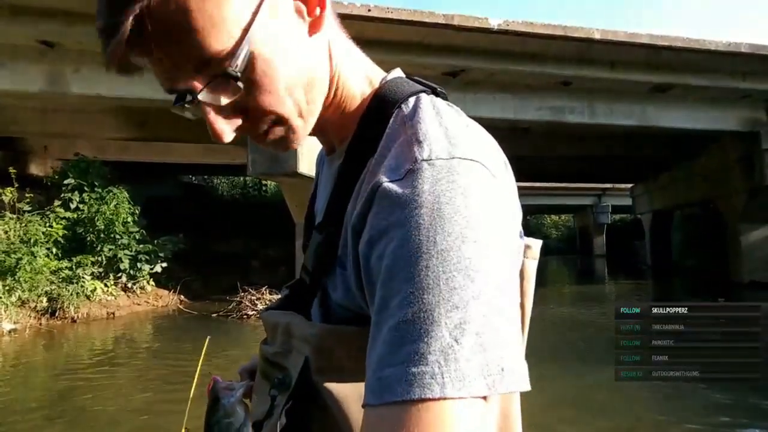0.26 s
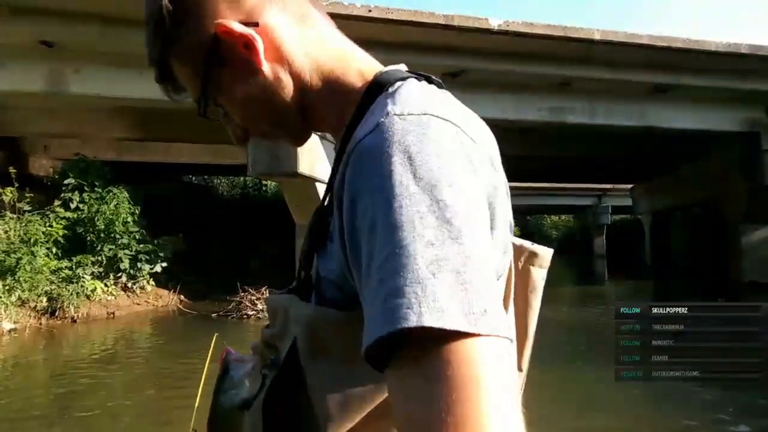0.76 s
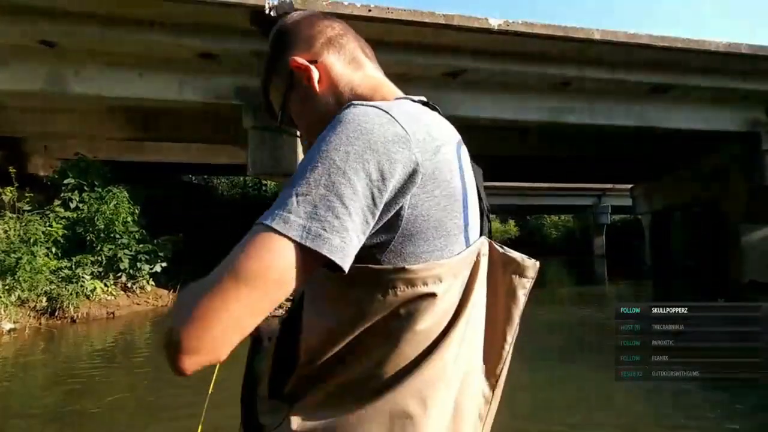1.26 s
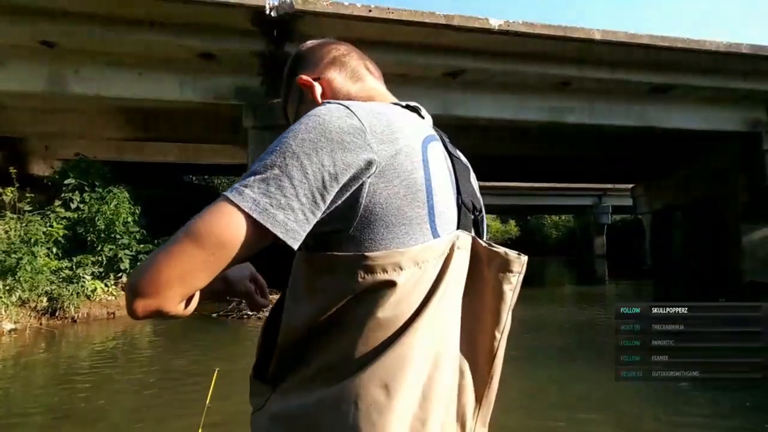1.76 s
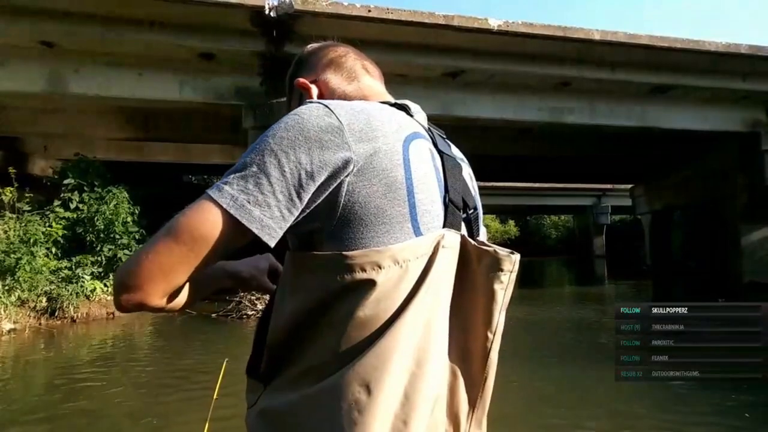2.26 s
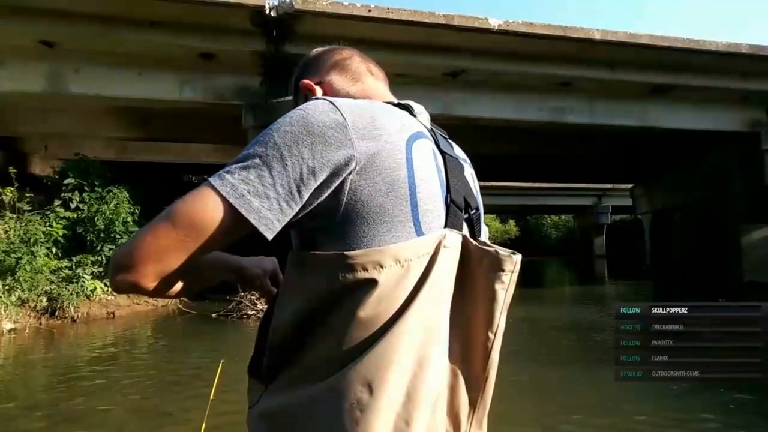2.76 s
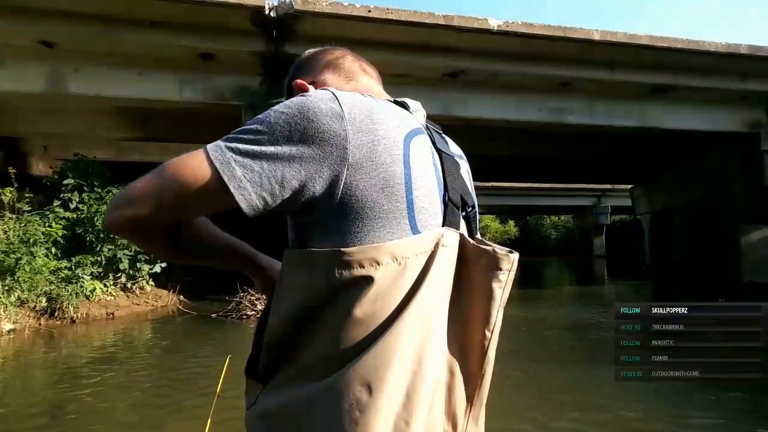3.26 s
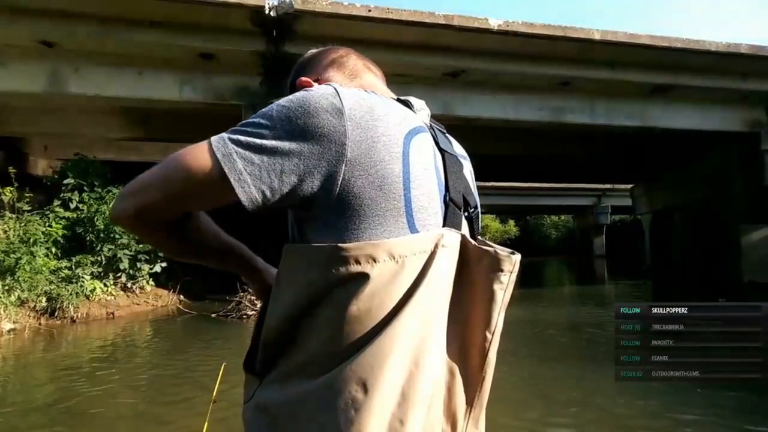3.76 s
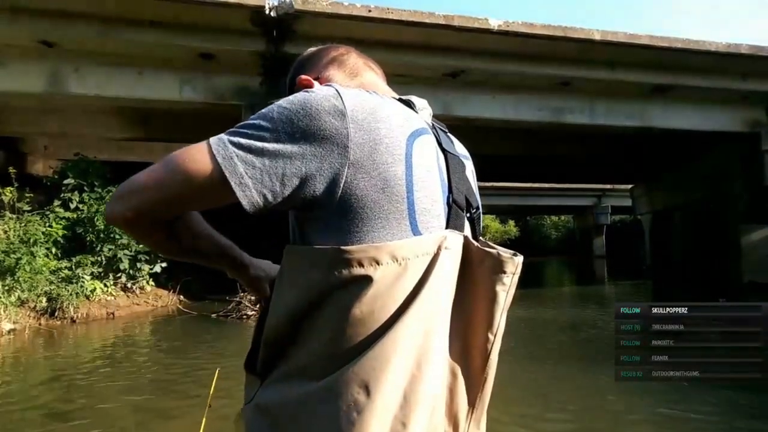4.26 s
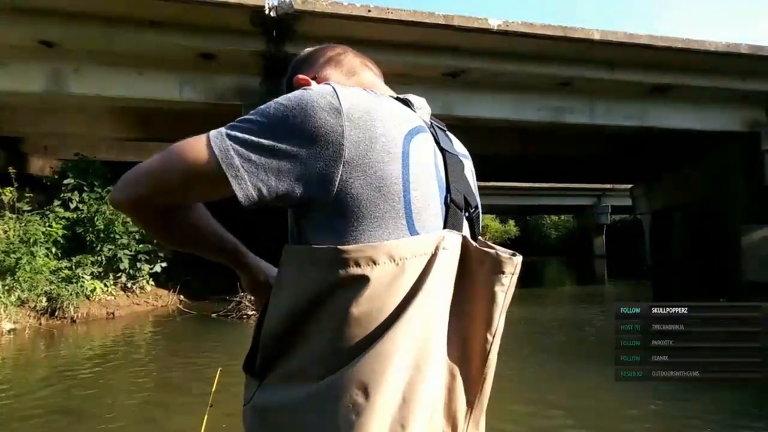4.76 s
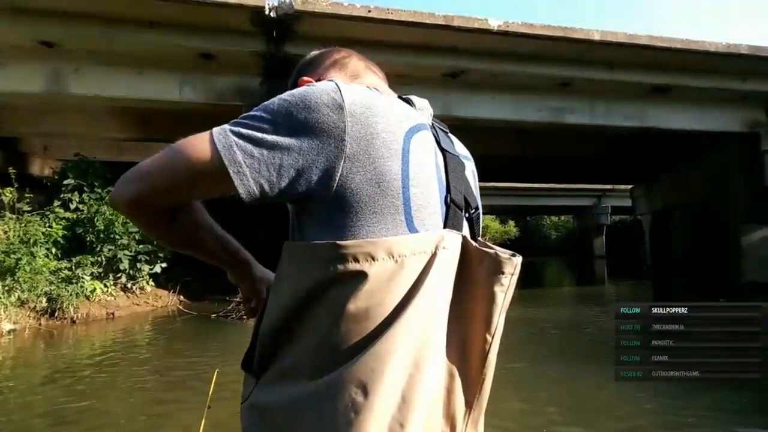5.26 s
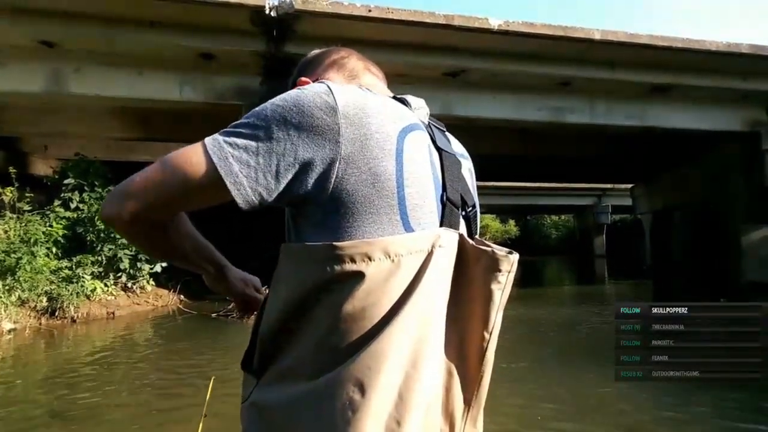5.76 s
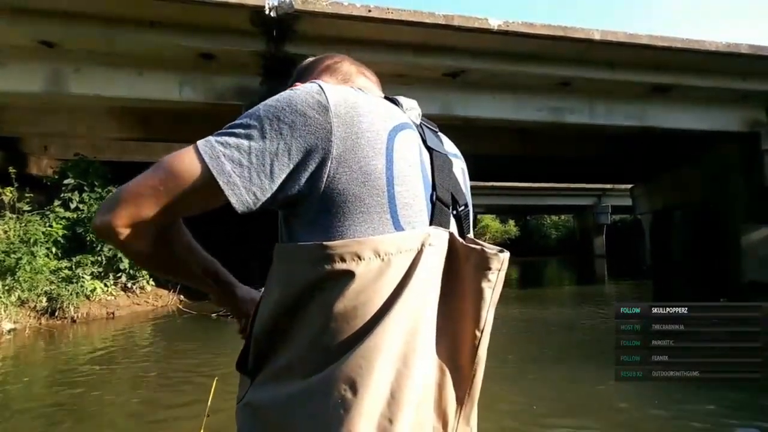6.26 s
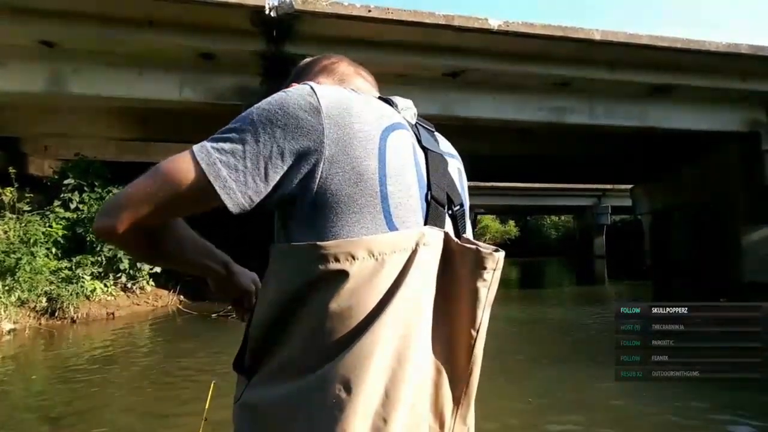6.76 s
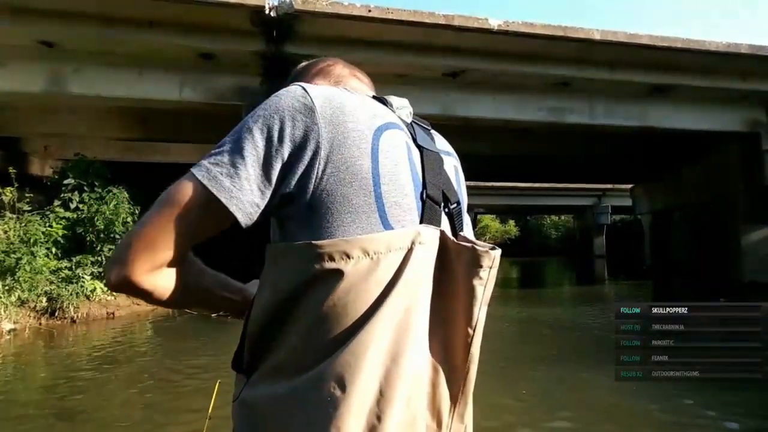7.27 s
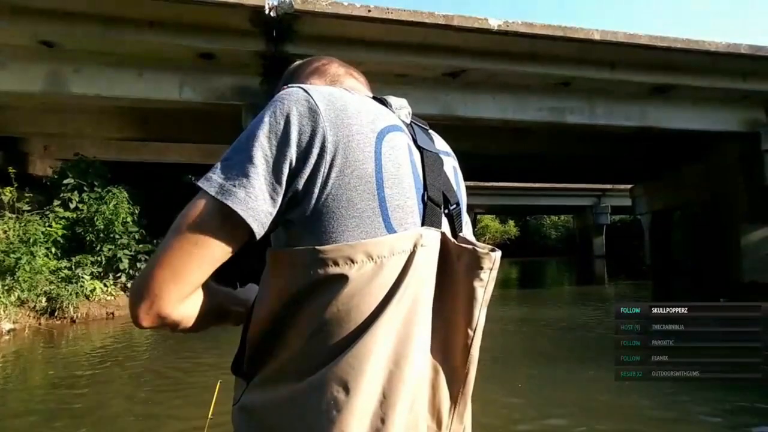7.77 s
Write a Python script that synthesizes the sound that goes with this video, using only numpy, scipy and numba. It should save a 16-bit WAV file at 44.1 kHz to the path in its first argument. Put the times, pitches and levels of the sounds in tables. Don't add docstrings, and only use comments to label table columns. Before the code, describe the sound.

Low engine drone and tyre roar from a bridge overhead, with shrill cricket trills, a pulsing cicada, drips, clicks and small bird chips beside a creek.

```python
import sys
import numpy as np
from scipy import signal
from scipy.fft import rfft, irfft, dct
from scipy.io import wavfile
from scipy.ndimage import uniform_filter1d
from numba import njit

SR = 44100
rng = np.random.default_rng(int(sys.argv[2]) if len(sys.argv) > 2 else 0)


def dump(signal):
    limited = np.clip(np.atleast_2d(signal).T, -1, 1)
    pcm = np.round(limited * 32767).astype(np.int16)
    wavfile.write(sys.argv[1], SR, pcm)


def amplitude_ratio(level_db):
    exponent = np.asarray(level_db, float) / 20
    return 10 ** exponent


N = 353770
T = np.arange(N) / SR

# time in seconds, octave in Hz, fundamental level in dB, octave level in dB.
DRONE = [(0.0, 168, -40, -33), (0.2, 167.6, -35.5, -31.5), (0.67, 166.7, -37, -29),
         (0.96, 168.2, -32.5, -31), (2.14, 167.6, -38.5, -32), (2.23, 168.5, -32, -34.5),
         (2.66, 166.6, -37.5, -29.5), (3.55, 168.5, -31, -30.5), (3.95, 169, -35, -27.5),
         (4.15, 169.2, -27, -26.5), (4.24, 168.2, -44, -24), (4.33, 168.8, -31, -27),
         (5.67, 169.2, -34, -29.5), (6.48, 168.7, -28.5, -28.5), (6.75, 168.8, -33, -26),
         (7.71, 169.1, -23.5, -31), (8.0, 168.9, -24, -20.5), (8.02, 169.0, -19, -23)]
# multiple of the firing rate, level at the start in dB, at the end in dB.
ENGINE_LINES = [(1.355, -53.5, -40), (2.43, -55.5, -53), (3, -61, -58)]
# centre in Hz, width in Hz, level re the tone in dB.
SLABS = [
    (81.2, 11.6, -7.5),
    (164.4, 9.8, -13),
    (261, 160, -28.5),
]
# time in seconds, tyre roar in dB.
ROAR = [(0, -49), (1.3, -48.5), (2.6, -49), (4.5, -49.5), (5.3, -48), (5.9, -46), (7.4, -47), (8.02, -45.5)]
# frequency in Hz, density in dB per Hz.
TYRE_SPECTRUM = [(190, 16), (260, 2), (430, -6), (800, 0.5), (1500, 0), (2500, -8), (4200, -14.5),
                 (5800, -11.5), (9000, -17.5), (11500, -30), (15500, -24.5)]
# frequency in Hz, density in dB per Hz.
RUMBLE_SPECTRUM = [(33, -5), (45, -2), (60, 3), (110, -3), (140, -0.5), (200, -14.5), (300, -29)]
# middle in seconds, length in seconds, level in dB.
PASSES = [
    (0.348, 0.23, -50.5),
    (1.0, .4, -53),
    (2.1, .3, -54),
    (3.85, 0.48, -56),
    (5.15, 0.49, -57),
    (7.5, 0.67, -49.5),
]
# time in seconds, level in dB.
JOINTS = [(.2, -38.5), (.95, -52), (1.36, -44), (2.1, -52), (2.75, -46), (3.35, -49), (3.91, -41),
          (4.58, -39), (5.29, -40), (5.85, -52), (6.3, -49), (8.0, -45)]
# strokes per second, middle of the stroke in cycles (0-1), pitch in Hz,
# sag at the end of a stroke in Hz.
STROKES = [
    (32.97, .47, 6268, 230),
    (33.8, .88, 7135, 120),
    (47.63, .52, 7940, 50),
    (57.18, .12, 8355, 40),
]
# sounding share (0-1), level offset in dB, octave in dB, flutter in dB.
WINGS = [
    (.62, 1.35, -25.5, 1.6),
    (0.55, -4.5, -47, 2),
    (0.67, -6.5, -48, 2),
    (0.52, -6.5, -42, 1.5),
]
# level in dB, change from seconds, to seconds, change in dB, wander in dB.
BOUTS = [
    (-43.5, 4.9, 5.2, -1, .7),
    (-40, 5.85, 7.78, -8, .7),
    (-45.5, 7.8, 8.1, -6, .7),
    (-63, 5.55, 7.8, 21.5, 1.0),
]
# frequency in Hz, level in dB.
CHORUS_SPECTRUM = [(5950, -22), (6120, -9), (6340, -16), (6550, -9), (6720, -4), (6900, -4), (7080, 0),
                   (7250, -4), (7390, -9), (7520, -5), (7760, -9), (7950, -6), (8250, -15), (8900, -29)]
# time in seconds, body level
# in dB, body pitch in Hz, closed belly level in dB.
CICADA = [(0, -42.5, 5145, -50), (1.5, -40.5, 5163, -50), (3.6, -42.5, 5120, -53.5),
          (4.3, -41.5, 4992, -56), (5.0, -45, 4750, -57), (5.6, -47.5, 4364, -54), (6.6, -51.5, 3900, -73),
          (7.3, -54, 4705, -51), (8.02, -49.5, 4673, -79)]
# centre in Hz, width in Hz, level in dB.
BELLY = [
    (3300, 550, -2),
    (4150, 1100, 0),
]
RIBS_HZ = [4232, 4775, 4905, 5023, 5270, 5350]
# start in seconds, end in seconds, strokes per second,
# middle of the stroke in cycles (0-1), level in dB.
BUZZES = [
    (0, 0.973, 29.0, .973, -54),
    (7.809, 8.02, 27.4, .588, -60),
]
# time in seconds, level in dB.
TICKS = [(6.4986, -58), (6.5989, -59), (6.7075, -58), (6.8026, -57), (6.891, -53), (6.978, -51),
         (7.0602, -56), (7.1371, -47), (7.2185, -48), (7.3009, -48), (7.384, -46), (7.4651, -46),
         (7.539, -50), (7.6226, -47), (7.7066, -46)]
# frequency in Hz, density in dB per Hz.
RASP_SPECTRUM = [(8500, -8), (10000, -18), (11000, -25), (11300, -10), (11700, -14), (13300, -15),
                 (14000, -4), (14300, -8), (14600, 0), (14900, -5), (15300, -4), (15900, -14)]
# start in seconds, level in dB, pitch in Hz, 60 dB decay in seconds.
BUMPS = [
    (.15, -21, 62, .1),
    (.176, -26, 340, .035),
    (.177, -33, 750, .035),
    (.197, -17, 55, .1),
]
# time in seconds, level in dB.
GUST = [(0, -53), (.04, -54), (.13, -50), (.2, -51), (.27, -57), (.4, -70), (8.02, -70)]
# start in seconds, level in dB, pitch in Hz.
DRIPS = [(1.281, -31, 577), (1.564, -32.5, 1360), (1.8, -33, 3250), (1.849, -37, 568), (1.867, -36, 2800),
         (1.888, -29.5, 3140), (2.046, -33, 3170), (2.059, -33.5, 2270), (2.129, -25, 770)]
# start in seconds, level in dB, centre in Hz, width in Hz.
CLICKS = [(1.293, -37, 3520, 1500), (1.758, -56, 11000, 2000), (1.888, -47, 4000, 1995),
          (2.041, -36, 4200, 1200), (2.137, -54, 11520, 3000), (2.19, -52, 10030, 3000),
          (4.667, -42, 10960, 4000), (4.828, -57, 10970, 3000), (5.552, -41, 10480, 3000),
          (6.066, -35.5, 10400, 3974), (6.066, -28, 4470, 2500), (4.667, -56, 14500, 2488),
          (1.293, -56, 10500, 4000), (6.157, -39, 3800, 990)]
# start in seconds, length in seconds, start pitch in Hz, end pitch in Hz, level in dB.
CHIPS = [(4.011, .011, 3400, 4590, -43), (4.02, .021, 4620, 4650, -35.5), (4.038, .012, 5740, 5600, -35),
         (4.05, .014, 4630, 4650, -43), (4.068, .016, 3050, 3700, -43), (4.192, 0.021, 4800, 4000, -40),
         (4.276, .02, 4780, 4400, -39), (4.325, .018, 3310, 3270, -46), (4.739, 0.033, 4606, 4200, -37.5),
         (5.512, .024, 5020, 4166, -40.5), (5.538, .011, 5740, 5810, -40), (5.568, .017, 3550, 3500, -44),
         (6.326, .02, 4300, 5820, -45), (6.321, .023, 2603, 4300, -44), (6.34, .018, 4300, 4420, -37),
         (6.358, 0.068, 4390, 4330, -54), (4.033, .012, 4592, 3480, -47), (7.175, 0.016, 3560, 4300, -43),
         (7.27, 0.1102, 3580, 3540, -57), (5.57, .025, 6026, 4570, -50), (4.088, .02, 5655, 4810, -44)]
# time in seconds, pitch in Hz, level in dB.
WHISTLE = [(6.988, 3750, -58), (7.0, 3950, -49), (7.02, 4280, -45), (7.045, 4400, -45), (7.08, 4150, -48),
           (7.135, 3660, -45), (7.152, 3900, -46), (7.166, 4550, -44), (7.173, 4750, -58)]
# middle in seconds, threshold re the local level in dB, depth.
DROPOUTS = [(.165, 6.5, .85), (0.351, 7, 0.77), (0.979, 3, 0.69), (1.462, 3.5, 0.96), (3.913, 8.5, 2.7),
            (4.23, 4, 0.96), (4.765, 5.5, 0.9), (5.132, 6.5, 0.9), (6.222, 4.5, 0.93), (7.06, 2, 1.2),
            (7.106, 4, 1.2), (7.548, 5.5, 1.16), (7.596, 7.5, 0.99), (7.76, 4.5, 1.1), (7.803, 4.5, 0.94)]


def curves(table):
    s, *columns = np.transpose(table)
    return [np.interp(T, s, column) for column in columns]


def unit(x):
    return x / np.sqrt(np.mean(x ** 2))


def noise():
    return rng.standard_normal(N)


def colour(x, spectrum):
    hz, db = np.transpose(spectrum)
    f = np.arange(N // 2 + 1) * SR / N + 1
    gain = amplitude_ratio(np.interp(np.log(f), np.log(hz), db))
    gain = gain * np.minimum(1, f / hz[0]) ** 4 * np.minimum(1, hz[-1] / f) ** 4
    return unit(irfft(rfft(x) * gain, N))


def walk(rate_hz):
    hold = int(SR / rate_hz)
    levels = np.repeat(rng.standard_normal(N // hold + 1), hold)
    return unit(uniform_filter1d(uniform_filter1d(levels, hold), hold)[:N])


@njit
def svf(x, hz, width_hz):
    y, b, l = np.empty(len(x)), 0., 0.
    for i in range(len(x)):
        g, k = np.tan(np.pi * hz[i] / SR), width_hz / hz[i]
        v = (b + g * (x[i] - l)) / (1 + g * (g + k))
        b, l, y[i] = 2 * v - b, l + 2 * g * v, k * v
    return y


def band(x, hz, width_hz):
    centre_hz = hz + 0 * T
    return svf(svf(x, centre_hz, 1. * width_hz), centre_hz, 1. * width_hz)


def add(out, s, sound):
    i = int(s * SR)
    out[i:i + len(sound)] += sound[:N - i]


def hump(s, length_s):
    return np.exp(-((T - s) / length_s) ** 2)


def stroke(rate_hz, middle, share, soft):
    place = ((rate_hz * T - middle + .5) % 1 - .5) * 2 / share
    return place, np.clip((1 - np.abs(place)) / soft, 0, 1)


def bout(db, start_s, end_s, change_db, wander_db):
    fade_s = 0.11
    inside = np.clip(np.minimum(T - start_s, end_s - T) / fade_s + .5, 0, 1)
    return db + change_db * inside + wander_db * walk(3.08)


def drone():
    octave_hz, low_db, octave_db = curves(DRONE)
    phase = np.pi * np.cumsum(octave_hz) / SR
    lines = amplitude_ratio(low_db + 1.0 * walk(20)) * np.sin(phase + 0.14 * walk(12))
    lines += amplitude_ratio(octave_db + 0.58 * walk(25)) * np.sin(2 * phase + 0.13 * walk(24))
    for multiple, first_db, last_db in ENGINE_LINES:
        line_db = np.linspace(first_db, last_db, N) + 2.7 * walk(5)
        lines += amplitude_ratio(line_db) * np.sin(multiple * phase + 0.88 * walk(6))
    slabs = 0
    for tone_db, (hz, width_hz, db) in zip((low_db, octave_db, low_db), SLABS):
        slabs = slabs + amplitude_ratio(tone_db + db) * unit(band(noise(), hz, width_hz))
    return np.sqrt(2) * lines + slabs


def road():
    roar_db, = curves(ROAR)
    octaves = 0
    for hz in 180 * 2. ** np.arange(7):
        swell_db = .9 * walk(1.5) + .6 * walk(12)
        octaves = octaves + amplitude_ratio(swell_db) * svf(noise(), hz + 0 * T, 0.81 * hz) / np.sqrt(hz)
    tilted = [(hz, db + 10 * np.log10(hz)) for hz, db in TYRE_SPECTRUM]
    roar = amplitude_ratio(roar_db + 3) * colour(octaves, tilted)
    shake = amplitude_ratio(roar_db + 8) + sum(amplitude_ratio(db) * hump(s, 0.17) for s, db in JOINTS)
    rumble = shake * amplitude_ratio(0.92 * walk(3.6)) * colour(noise(), RUMBLE_SPECTRUM)
    whine = amplitude_ratio(-61) + sum(amplitude_ratio(db) * hump(s, length_s) for s, length_s, db in PASSES)
    return roar + rumble + whine * amplitude_ratio(-5) * unit(band(noise(), 877, 350))


def cricket(rate_hz, middle, hz, sag_hz, share, octave_db, flutter_db):
    place, env = stroke(rate_hz, middle, share, .33)
    sag = np.clip(place, 0, 1) ** 2
    drift_hz = 8 * walk(12) + 4 * flutter_db * walk(40)
    phase = 2 * np.pi * np.cumsum(hz - sag_hz * sag + drift_hz) / SR
    tone = np.sin(phase) + amplitude_ratio(octave_db - 8 * sag) * np.sin(2 * phase)
    return unit(env * tone * amplitude_ratio(flutter_db * walk(60) + 3.5 * sag))


def crickets():
    near = 0
    for level, beat, (share, offset_db, octave_db, flutter_db) in zip(BOUTS, STROKES, WINGS):
        singer = cricket(*beat, share, octave_db, flutter_db)
        near = near + amplitude_ratio(bout(*level) + offset_db) * singer
    echo = amplitude_ratio(-16) * np.roll(near, int(.013 * SR))
    crowd = 0
    for pitch, pace, start in rng.random((24, 3)):
        _, env = stroke(30 + 30 * pace, start, 0.69, 0.31)
        crowd = crowd + env * svf(noise(), 6000 + 2700 * pitch + 0 * T, 500.0)
    overtone = amplitude_ratio(-41) * unit(band(noise(), 14050, 1100))
    return near + echo + amplitude_ratio(-37.5) * (colour(crowd, CHORUS_SPECTRUM) + overtone)


def cicada():
    body_db, body_hz, closed_db = curves(CICADA)
    every_s, rise_s, fall_s, open_db, drop_hz = .601, 0.077, 0.26, -41.5, 281.4
    opening, climb = 0, 0
    climb_s = [rise_s - every_s, -rise_s, 0, every_s - rise_s]
    for peak_s in 0.374 + every_s * np.arange(6):
        t = T - peak_s
        opening = opening + np.clip(np.minimum(1 + t / rise_s, 1 - t / fall_s), 0, 1)
        climb = climb + np.interp(t, climb_s, [0, .5, -.5, 0])
    belly_db = closed_db + (open_db - closed_db) * opening
    beats = np.cumsum(body_hz / 43 * (1 + .004 * walk(8))) / SR
    valley = rng.standard_normal(SR // 10) * np.exp(-T[:SR // 10] / 0.015)
    ticks = unit(signal.fftconvolve(np.diff(np.floor(beats), prepend=0), valley)[:N])
    clicks = (rng.standard_normal((3, N)) + .4 * ticks) * amplitude_ratio(.8 * walk(14))
    belly = sum(amplitude_ratio(db) * band(c, hz, width_hz) for c, (hz, width_hz, db) in zip(clicks, BELLY))
    ribs = amplitude_ratio(4) * sum(svf(noise(), hz * (1 + .002 * walk(3)), 35.) for hz in RIBS_HZ)
    body = unit(svf(clicks[2] + ribs, body_hz + drop_hz * climb, 1080.0))
    song = amplitude_ratio(body_db) * body + amplitude_ratio(belly_db) * unit(belly)
    return signal.sosfilt(signal.butter(6, [3000, 5700], "band", fs=SR, output="sos"), song)


def katydid():
    env = np.zeros(N)
    for start_s, end_s, rate_hz, middle, db in BUZZES:
        _, strokes = stroke(rate_hz, middle, 0.76, 0.78)
        env += amplitude_ratio(db) * (strokes + 0.36) * (T >= start_s) * (T < end_s)
    t = T[:SR // 20]
    for s, db in TICKS:
        add(env, s - .003, amplitude_ratio(db) * np.clip(t / .003, 0, 1) * np.exp(-t / .012))
    rasp = env * colour(noise(), RASP_SPECTRUM)
    blur = amplitude_ratio(-9.0) * uniform_filter1d(env, size=1500) * unit(band(noise(), 9600, 5000))
    answer_env = amplitude_ratio(-12) * np.roll(env, int(.041 * SR)) * (T > 6)
    return rasp + blur + answer_env * unit(band(noise(), 9600, 1200))


def handling():
    out, t = np.zeros(N), T[:SR // 8]
    for s, db, hz, t60_s in BUMPS:
        add(out, s, amplitude_ratio(db) * np.exp(-np.log(1000) * t / t60_s) * np.sin(2 * np.pi * hz * t))
    for s, db, hz in DRIPS:
        cycles = hz * t
        env = np.clip(cycles / 3, 0, 1) * np.exp(-t / 0.0041)
        add(out, s, amplitude_ratio(db) * env * np.sin(2 * np.pi * cycles * (1 + 0.0018 * cycles)))
    for s, db, hz, width_hz in CLICKS:
        late = t - .001
        env = np.exp(-(late * width_hz * 1.6) ** 2)
        add(out, s - .001, amplitude_ratio(db + 10.0) * env * np.sin(2 * np.pi * hz * late))
    gust_db, = curves(GUST)
    return out + amplitude_ratio(gust_db + 4.0 * walk(30)) * unit(band(noise(), 310, 320))


def birds():
    hz, db = curves(WHISTLE)
    sounding = (T > WHISTLE[0][0]) * (T < WHISTLE[-1][0])
    out = amplitude_ratio(db) * np.sqrt(2) * np.sin(2 * np.pi * np.cumsum(hz) / SR) * sounding
    arch_hz, fade_db = 45, 4
    for s, length_s, start_hz, end_hz, db in CHIPS:
        u = np.linspace(-1, 1, int(length_s * SR))
        hz = (start_hz + end_hz) / 2 + (end_hz - start_hz) / 2 * u + arch_hz * (1 - u ** 2)
        env = amplitude_ratio(db - fade_db * u) * np.sqrt(2 * (1 - u ** 2))
        add(out, s, env * np.sin(2 * np.pi * np.cumsum(hz) / SR))
    out = out * amplitude_ratio(2.0 * walk(150) - 1.5)
    t = T[:SR // 4]
    banks = rng.standard_normal(len(t)) * np.exp(-t / 0.034) * (t > .008)
    return out + amplitude_ratio(-9) * signal.fftconvolve(out, banks / np.linalg.norm(banks))[:N]


def scene():
    return (drone() + road() + crickets() + cicada() + katydid() + handling() + birds())[None]


def drop_faint_lines(x):
    out, size = x.copy(), 2048
    for s, db, depth in DROPOUTS:
        i = int(s * SR) - size // 2
        window = np.minimum(depth * np.hanning(size), 1)
        lines = dct(x[i:i + size] * window)
        local = np.sqrt(uniform_filter1d(lines ** 2, size=120))
        threshold = amplitude_ratio(db) * np.minimum(local, np.median(local[100:450]))
        faint = lines * (np.abs(lines) < threshold)
        out[i:i + size] -= dct(faint, type=3) / (2 * size)
    return out


def band_limit(x):
    return signal.sosfilt(signal.butter(12, 16430, fs=SR, output="sos"), x)


def record(dry):
    top = signal.ellip(8, .2, 50, 15400, fs=SR, output="sos")
    mix = drop_faint_lines(signal.sosfilt(top, dry[0]))[None]
    return band_limit(mix)


dry = scene()
out = record(dry)
dump(out)
```